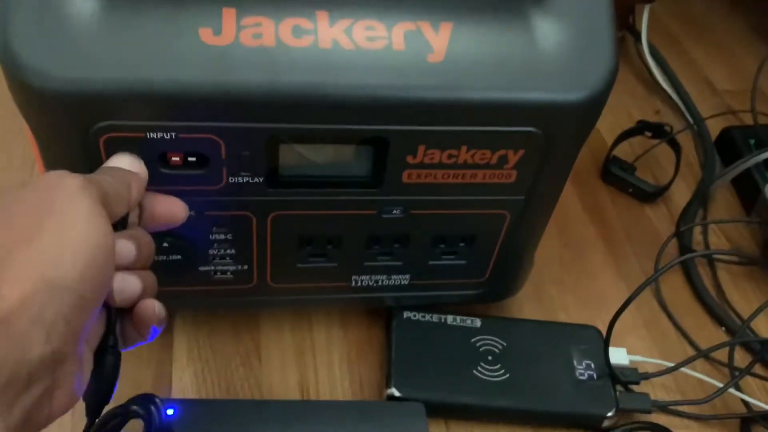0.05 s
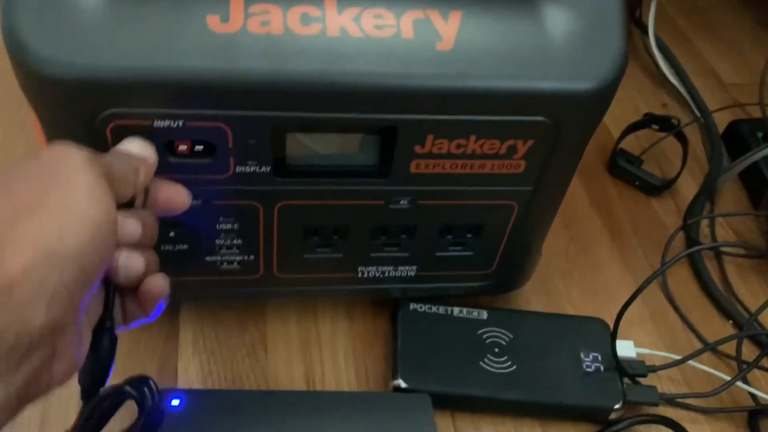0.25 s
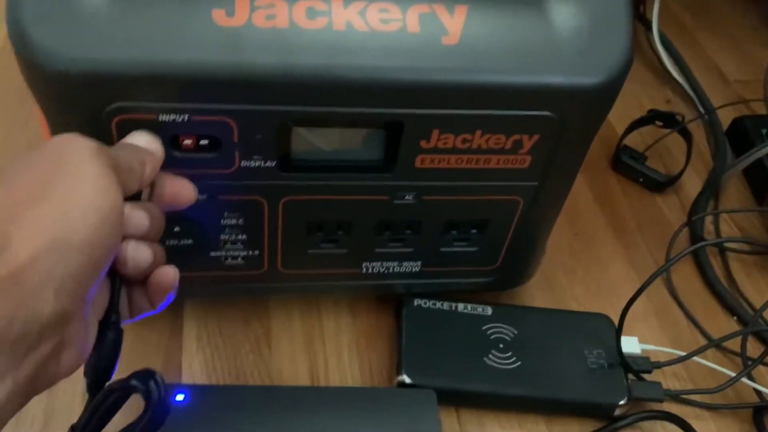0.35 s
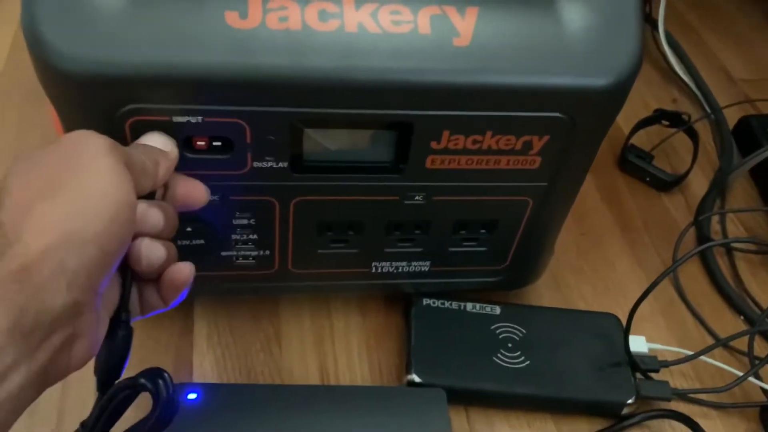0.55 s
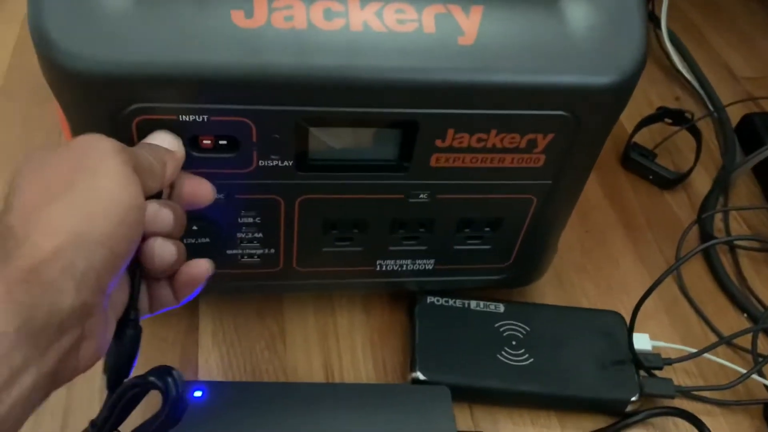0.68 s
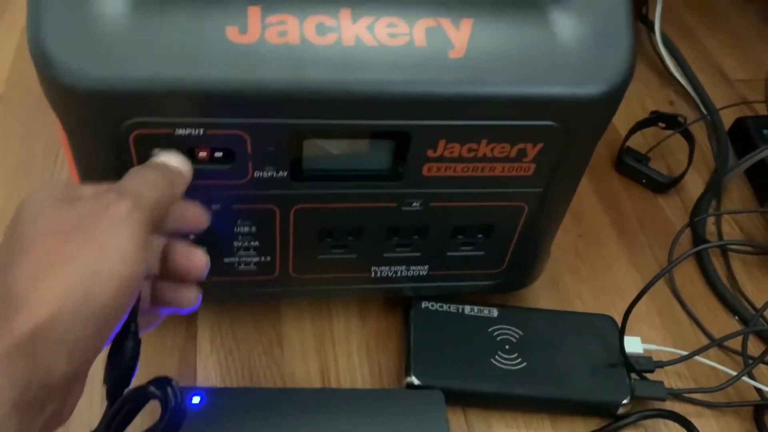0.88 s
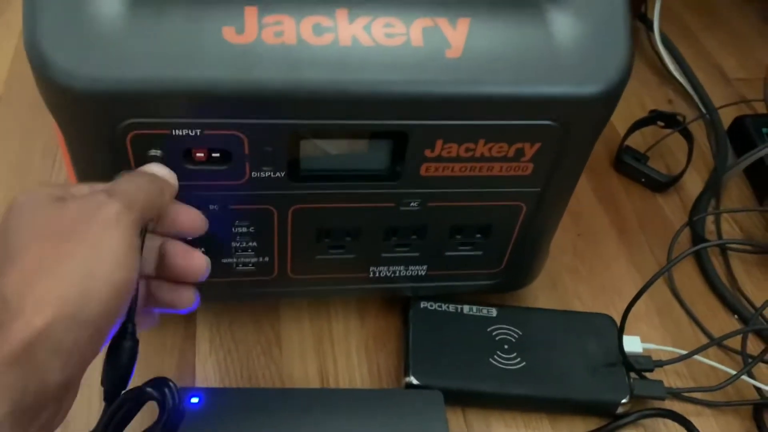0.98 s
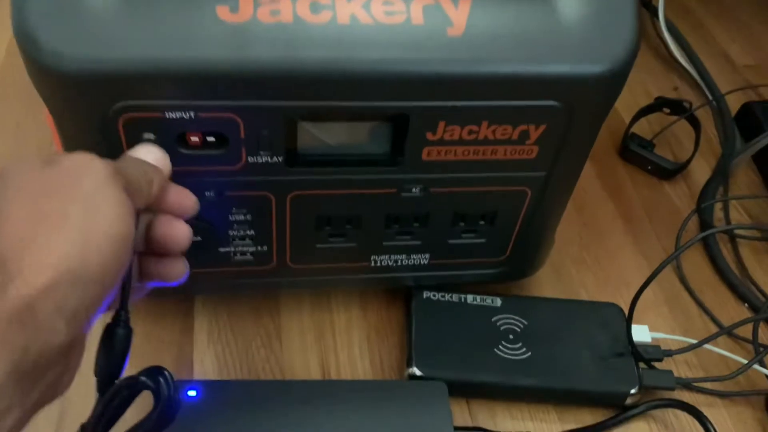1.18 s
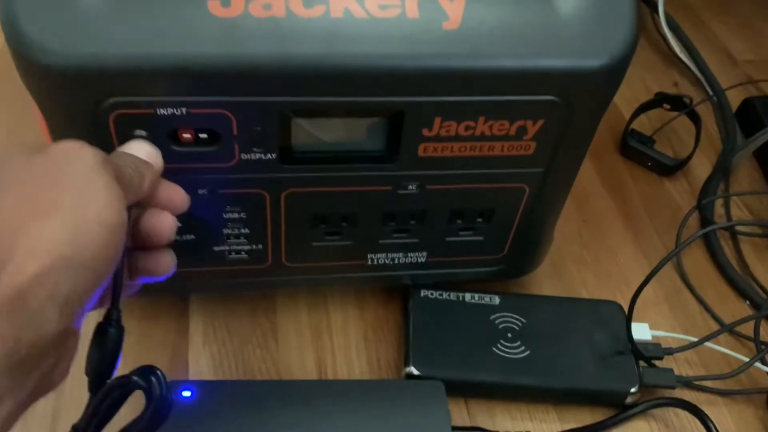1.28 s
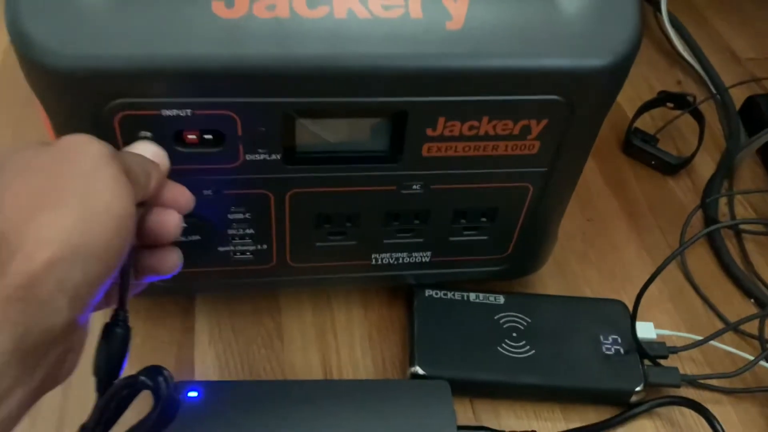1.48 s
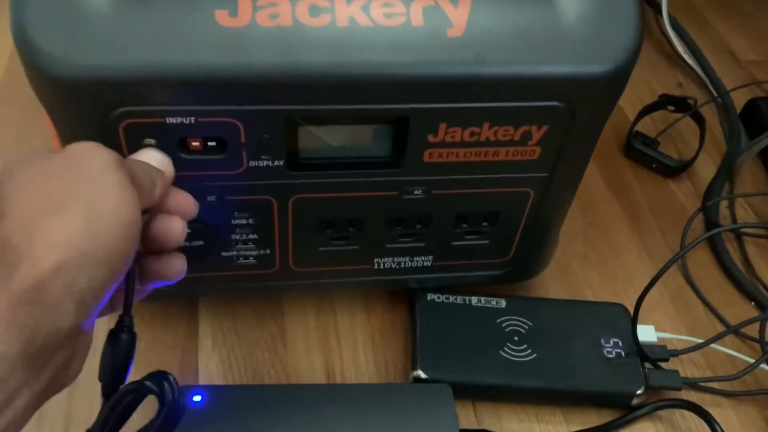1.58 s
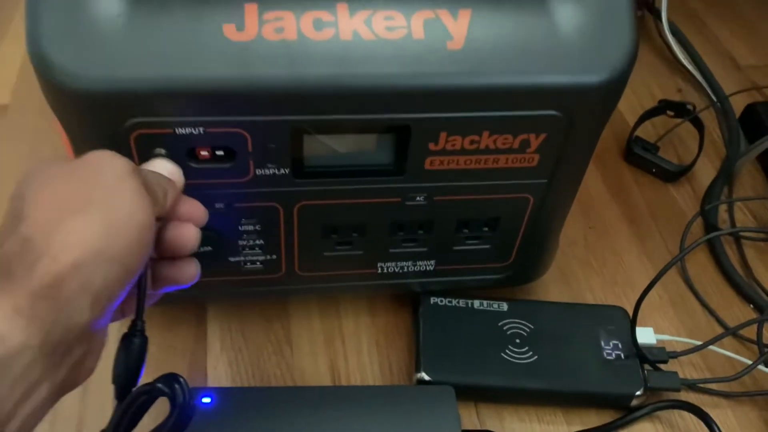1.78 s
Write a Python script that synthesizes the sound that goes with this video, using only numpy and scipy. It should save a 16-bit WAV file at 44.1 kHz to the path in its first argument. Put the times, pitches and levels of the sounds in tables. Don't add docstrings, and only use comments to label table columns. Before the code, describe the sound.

Early on, a hard plastic latch clicks home and rebounds at once, thudding the hollow case and wooden floor; soft rubs, small ticks and low bumps follow, close phone microphone, short indoor echo, low rumble.

```python
import sys
import numpy as np
from scipy import signal
from scipy.fft import rfft, irfft, next_fast_len
from scipy.io import wavfile
from scipy.ndimage import uniform_filter1d

SR = 44100
rng = np.random.default_rng(int(sys.argv[2]) if len(sys.argv) > 2 else 0)


def materialize(psi):
    bounded = np.clip(np.atleast_2d(psi).T, -1, 1)
    quanta = np.round(bounded * 32767).astype(np.int16)
    wavfile.write(sys.argv[1], SR, quanta)


def magnitude_from_level(level_db):
    exponent = np.asarray(level_db, float) / 20
    return 10 ** exponent


N = 81585
PAD = 4410
M = next_fast_len(N + PAD, True)
LEFT_RIGHT = np.array([[1], [-1]])

# pitch_hz, level_db, t60_s (time to fade by 60 dB)
CASE_TONES = [(228.3, -7.5, 0.14), (296.6, 4, 0.14), (370, -22.5, 0.21), (431, -17.5, 0.15),
              (597, -14.5, .06), (661, -12, 0.095), (778, -15.5, 0.042), (923.4, -13.5, 0.099),
              (1006, -10.5, 0.055), (1104, -18, 0.1), (1229, -14.5, 0.071), (1353, -10.5, 0.041),
              (498, -21, 0.11), (259.7, -19.5, 0.48)]
# start_s, level_db, rattle_s
LATCH_SNAPS = [
    (0.212, -48.5, 0.009),
    (0.214, -29.5, 0.004),
    (0.2312, -41, .005),
    (.244, -61, 0.0037),
]


def band(x, hz, width):
    edges = [hz / (1 + width), min(hz * (1 + width), 0.47 * SR)]
    return signal.sosfilt(signal.butter(1, edges, "band", fs=SR, output="sos"), x)


def ring(x, hz, t60):
    pole = np.exp(2j * np.pi * hz / SR - np.log(1000) / (t60 * SR))
    return signal.lfilter([1], [1, -pole], x).imag


def body(x, modes, spread_db):
    tilt_db = np.tanh(rng.standard_normal(len(modes))) * spread_db
    out = np.zeros((2, M))
    for k, (hz, db, t60) in enumerate(modes):
        gain = magnitude_from_level(db + tilt_db[k] * LEFT_RIGHT / 2)
        out += (-1) ** (k + 1) * gain * ring(x, hz, t60)
    return out


def add(x, start_s, piece):
    i = int(start_s * SR) + PAD
    x[i:i + len(piece)] += piece


def fade(t, t60):
    return 1000.0 ** (-t / t60)


def push(length_s):
    w = np.hanning(max(int(length_s * SR), 1) + 2)[1:-1]
    return w / w.sum()


def slips(length_s, rate):
    chance, sign, size = rng.random((3, int(length_s * SR)))
    strength = magnitude_from_level(-2.5 * np.log(size + 1e-3) - 4)
    return (chance < rate / SR) * np.sign(sign - 0.5) * strength


def walk(rate):
    k = int(SR / rate)
    steps = np.repeat(rng.standard_normal(M // k + 1), k)
    w = uniform_filter1d(steps, k)[:M]
    return w / w.std()


def latch():
    # pitch_hz, level_db, t60_s
    shell_tones = [(1707, -9.5, 0.0071), (2060, 0, 0.011), (2313, -0.5, 0.022), (2750, -1.5, 0.018),
                   (3110, 1, .012), (3480, -6.5, 0.012), (4033, 0.5, 0.011), (4520, -9, 0.0088),
                   (5830, -23.5, 0.0027), (7100, -17.5, 0.0074), (10070, -18, 0.012), (12000, -22, .008),
                   (13600, -25, .006), (15400, -13, 0.0055)]
    force = np.zeros(M)
    for start_s, db, rattle_s in LATCH_SNAPS:
        clicks = 0.81 * slips(0.02, 5000)
        clicks[0] = 2
        add(force, start_s, magnitude_from_level(db - 9.5) * clicks * np.exp(-np.arange(len(clicks)) / SR / rattle_s))
    shell = body(force, shell_tones, 1.5)
    knock = magnitude_from_level(5) * band(force, 2500, 0.4)
    case_ring = magnitude_from_level(1.5) * body(force, CASE_TONES[3:13], 1.2)
    return shell + knock + case_ring


def sleeve():
    # pitch_hz, level_db, t60_s
    sleeve_tones = [(287, 0, 0.053), (621, -4, 0.048), (1390, -9.5, 0.033), (2340, -9.5, 0.022),
                    (3000, -12, .015), (3650, -10.5, 0.0089), (4560, -24.5, 0.015), (7180, -26.5, 0.0049),
                    (10900, -20, 0.0031)]
    # start_s, end_s, level_db, rise_s
    slide = (.177, .212, -51, .006)
    start_s, end_s, db, rise_s = slide
    scrape = np.zeros(M)
    clicks = slips(end_s - start_s, 2500)
    add(scrape, start_s, clicks * (1 - np.exp(-np.arange(len(clicks)) / SR / rise_s)))
    sound = body(scrape, sleeve_tones, 1.5)
    return sound * magnitude_from_level(db) / np.sqrt((sound[0] ** 2).sum() / len(clicks))


def case():
    # start_s, level_db, contact_s, boards_db
    blows = [
        (-.05, -47, 0.0014, 3),
        (0.185, -50, 0.00093, -18),
        (0.2184, -26, 0.00053, -15.5),
        (.232, -39.5, 0.00066, -4),
    ]
    # pitch_hz, level_db, t60_s
    board_tones = [(66.6, -5, 0.26), (96.1, -4, 0.46), (129.26, 0.5, 0.23), (162, 4.5, 0.11),
                   (200, 2.5, 0.24)]
    force, floor = np.zeros(M), np.zeros(M)
    for start_s, db, contact_s, boards_db in blows:
        add(force, start_s, magnitude_from_level(db) * push(contact_s))
        add(floor, start_s, magnitude_from_level(db + boards_db) * push(0.0042))
    out = body(force, CASE_TONES, 1.6)
    for tone in board_tones:
        late_s = 0.022 * 100 / tone[0]
        out += np.roll(body(floor, [tone], 0.62), int(late_s * SR), axis=1)
    return out


def ticks():
    # start_s, level_db, pitch_hz, t60_s
    tick_list = [(0.461, -80, 11600, 0.027), (0.47, -69, 7400, 0.0069), (.5247, -72, 11440, 0.015),
                 (.5631, -69.5, 10850, 0.027), (0.8156, -72.5, 12000, 0.032), (.9298, -64, 2580, 0.028),
                 (.9702, -51, 2610, 0.029), (.972, -60, 874, 0.038), (0.97, -54, 3070, .04),
                 (.985, -67, 2940, 0.052), (.998, -65, 2960, 0.049), (1.3194, -77.5, 10500, 0.036),
                 (1.367, -76, 1380, 0.041)]
    out, t = np.zeros(M), np.arange(5000) / SR
    for start_s, db, hz, t60 in tick_list:
        rough = min(hz / 9000, 1) ** 2
        noise = band(band(rng.standard_normal(len(t)), hz, 0.15), hz, 0.18)
        sound = (1 - rough) * np.sin(2 * np.pi * hz * t) + 3 * rough * noise
        add(out, start_s, magnitude_from_level(db) * sound * fade(t, t60) * (1 - np.exp(-t / 0.00023)))
    return out


def bumps():
    # start_s, level_db, pitch_hz, t60_s
    bump_list = [(0, -65, 1440, 0.02), (0, -56.5, 230, 0.17), (0, -56, 80, 0.11), (.34, -52, 166, 0.21),
                 (0.384, -60, 70.5, 0.6), (.545, -52.5, 179.3, 0.14), (0.599, -64, 129, 0.079),
                 (0.681, -66.5, 297, 0.15), (0.74, -58.5, 322, 0.085), (.7946, -70, 3000, 0.032),
                 (0.8178, -69.5, 2780, 0.074), (0.824, -63, 294, 0.24), (.826, -73.5, 1000, 0.14),
                 (.85, -62, 160, 0.12), (0.942, -69.5, 355, 0.11), (.975, -65.5, 330, 0.13),
                 (0.991, -60.5, 160, 0.13), (1.101, -55, 97, 0.15), (1.44, -56, 80, 0.19),
                 (1.217, -64, 149, 0.14), (1.275, -47.5, 90, 0.18), (1.3228, -76, 2460, .04),
                 (1.329, -57, 200, 0.12)]
    out, t = np.zeros(M), np.arange(5000) / SR
    for start_s, db, hz, t60 in bump_list:
        noise = band(band(rng.standard_normal(len(t)), hz, 0.45), hz, 0.45)
        tone = 1.44 * max(1 - hz / 400, 0) * np.sin(2 * np.pi * hz * t)
        sound = noise / noise.std() * min(hz / 400, 1) + tone
        add(out, start_s, magnitude_from_level(db) * sound * fade(t, t60) * (1 - np.exp(-t * hz * 0.5)))
    return out


def rubs():
    # start_s, end_s, level_db
    rub_list = [
        (.43, .48, -87),
        (0.502, 0.579, -92.5),
        (0.696, 0.782, -80.5),
        (0.798, 0.857, -94),
        (1.287, 1.35, -88),
    ]
    rub_pitches = (11000, 15400)
    low, high = rub_pitches
    out = np.zeros(M)
    for start_s, end_s, db in rub_list:
        n = int((end_s - start_s) * SR)
        grit = rng.standard_normal(n)
        dry_hiss = band(band(grit, low, 0.14), low, 0.11)
        dry_hiss += 2.1 * band(band(grit, high, 0.07), high, 0.07)
        add(out, start_s, magnitude_from_level(db + 10) * np.hanning(n) ** 0.5 * dry_hiss)
    return out


def cracks():
    out = np.zeros(M)
    for start_s, db, _ in LATCH_SNAPS:
        add(out, start_s, magnitude_from_level(db + 18) * push(0.0001))
    return out


def room(x):
    # pitch_hz, t60_s, level_db
    echo_bands = [(80, 0.64, -4.5), (160, 0.38, -2), (545, 0.31, -3), (1000, 0.25, -6.5),
                  (2070, 0.19, -5.5), (4000, 0.06, -12), (9000, .1, -24), (14100, 0.092, -25.5)]
    t = np.arange(int(0.6 * SR)) / SR
    echo = np.zeros((2, len(t)))
    for hz, t60, db in echo_bands:
        mid, side = band(rng.standard_normal((2, len(t))), hz, 0.58)
        pair = mid + min(hz / 1500, 1) ** 0.55 * side * LEFT_RIGHT
        pair = pair * fade(t, t60) * (1 - np.exp(-t / 0.0029))
        echo += magnitude_from_level(db) * pair / np.sqrt(t60 * SR / 14)
    return signal.fftconvolve(x.mean(axis=0)[None], echo, axes=1)[:, :M]


def coloured(table, side_db):
    f = np.arange(M // 2 + 1) * SR / M + 1e-3
    hz, db = np.transpose(table)
    gain = magnitude_from_level(np.interp(np.log(f), np.log(hz), db, left=-80, right=-80))
    mid, side = irfft(rfft(rng.standard_normal((2, M))) * gain, M)
    return (mid + magnitude_from_level(side_db) * side * LEFT_RIGHT) / mid.std()


def background_noise():
    # pitch_hz, level_db
    rumble = [(30, -20), (45, -2.5), (68, 1), (100, -10.5), (155, -8.5), (250, -23), (450, -29),
              (1000, -40.5)]
    hiss = [(800, -20), (1000, -1), (7400, -10.5), (8000, -21), (9000, -21), (9500, -7), (12400, -8),
            (13000, -32)]
    air = [(14000, -12.5), (14400, -8), (15100, -10), (15600, -30)]
    side_db = 0.5
    tone = magnitude_from_level(-65.5 - 0.5 * walk(14)) * coloured(rumble, -8)
    tone += magnitude_from_level(-86 + 0.4 * walk(18)) * coloured(hiss, side_db)
    tone += magnitude_from_level(-99 + 3.6 * np.minimum(walk(31), 0.5)) * coloured(air, side_db)
    return tone


def scene():
    hand = ticks() + bumps() + rubs()
    near = latch() + sleeve() + case() + hand
    wet = room(magnitude_from_level(-9) * (near - 0.55 * hand) + cracks())
    right_lag_s = 0.00016
    lag = np.exp(-2j * np.pi * np.arange(M // 2 + 1) * SR / M * right_lag_s)
    near[1] = irfft(rfft(near[1]) * lag, M)
    return (near + wet + background_noise())[:, PAD:PAD + N]


def low_pass(x):
    return signal.sosfilt(signal.butter(12, 15940, fs=SR, output="sos"), x)


def record(dry):
    low_cut = signal.butter(2, 41.5, "high", fs=SR, output="sos")
    return low_pass(signal.sosfilt(low_cut, dry))


dry = scene()
out = record(dry)
materialize(out)
```